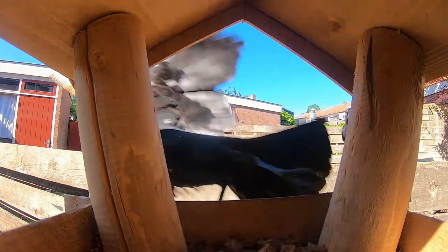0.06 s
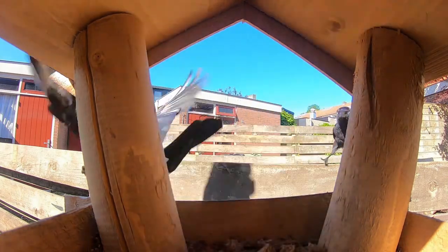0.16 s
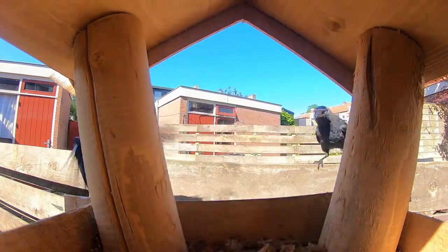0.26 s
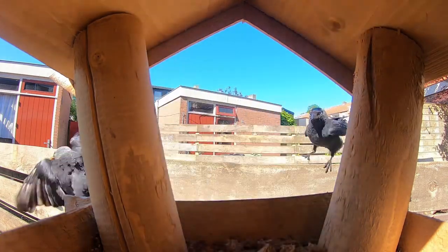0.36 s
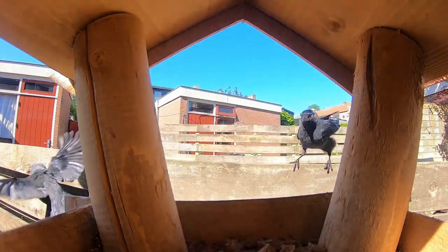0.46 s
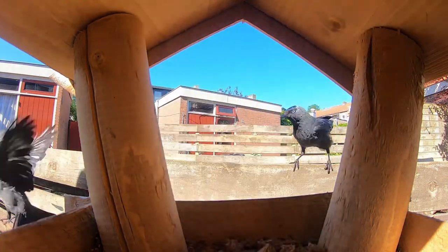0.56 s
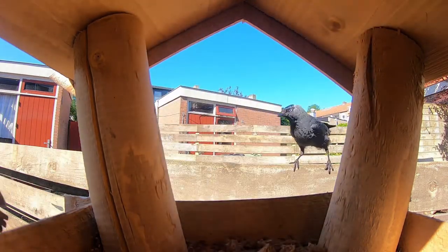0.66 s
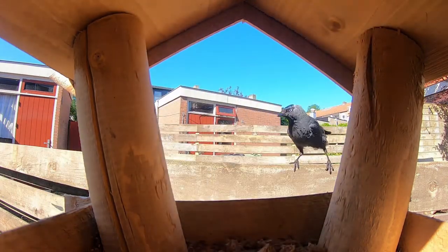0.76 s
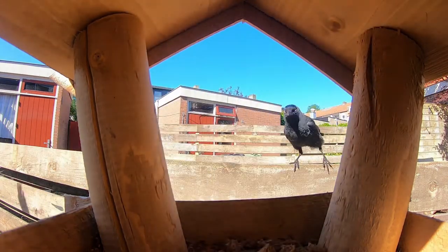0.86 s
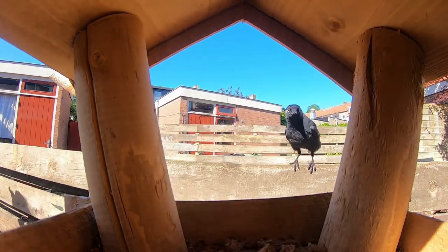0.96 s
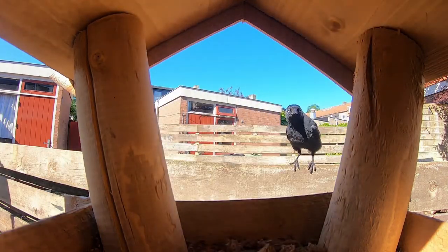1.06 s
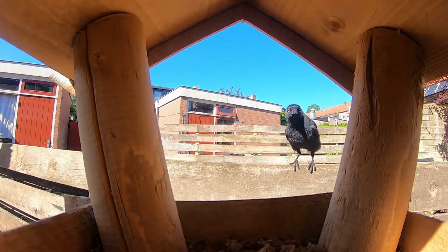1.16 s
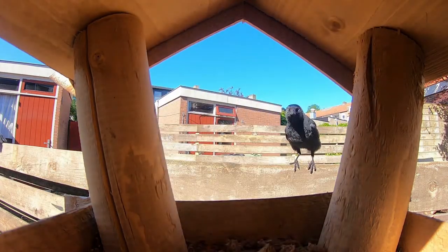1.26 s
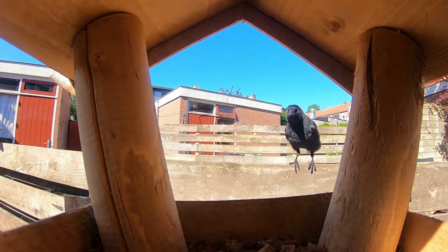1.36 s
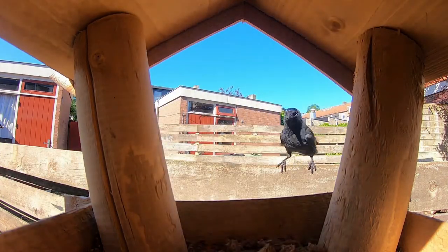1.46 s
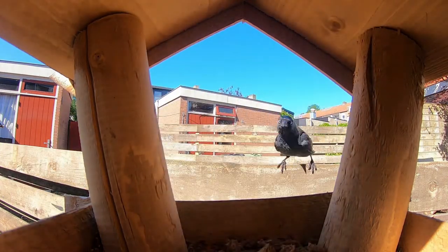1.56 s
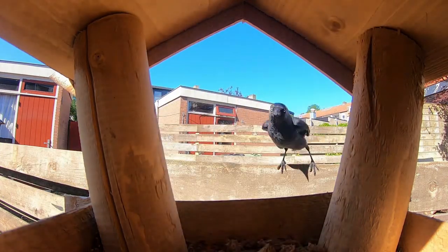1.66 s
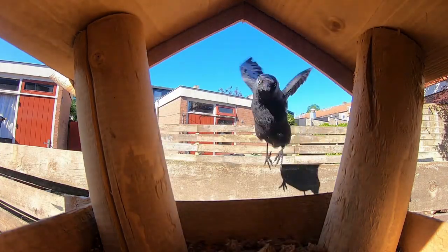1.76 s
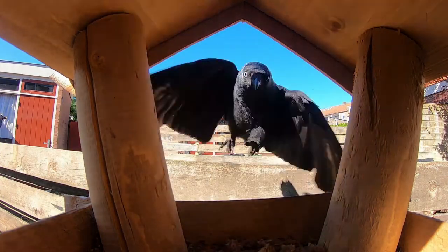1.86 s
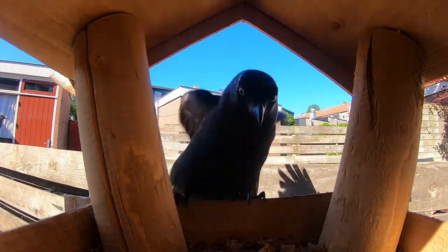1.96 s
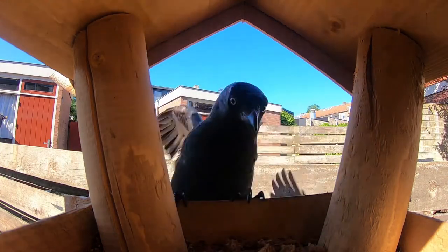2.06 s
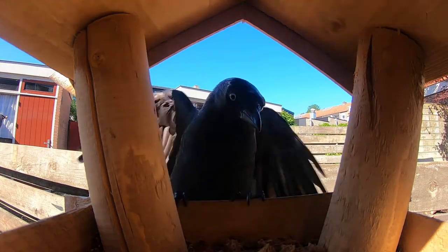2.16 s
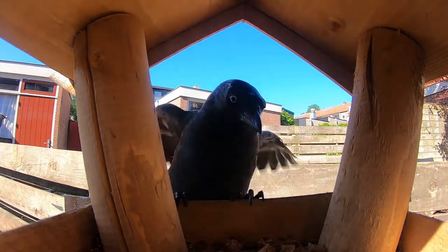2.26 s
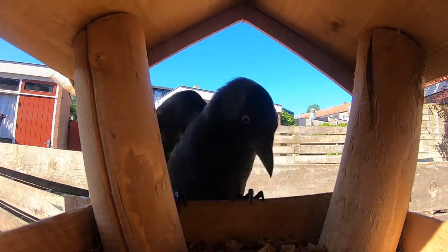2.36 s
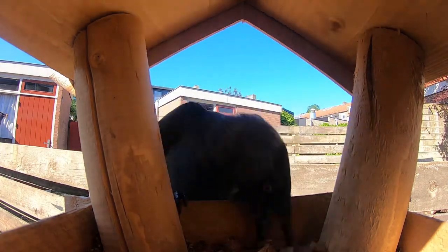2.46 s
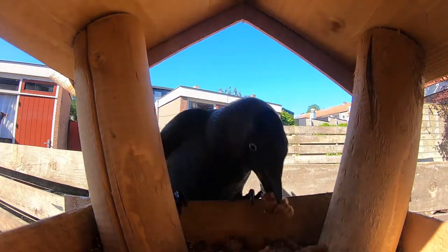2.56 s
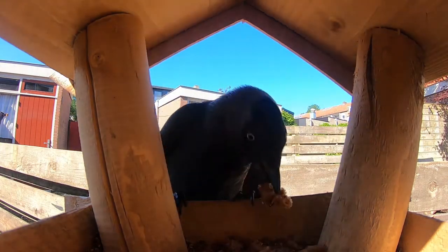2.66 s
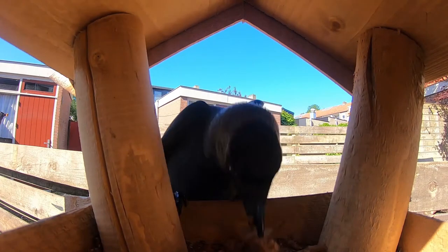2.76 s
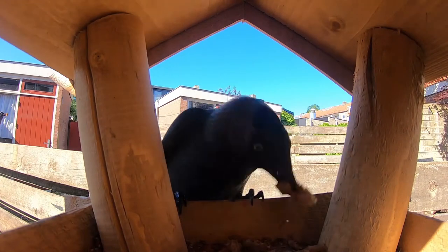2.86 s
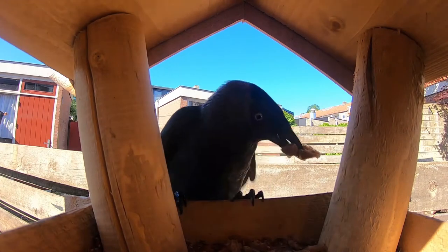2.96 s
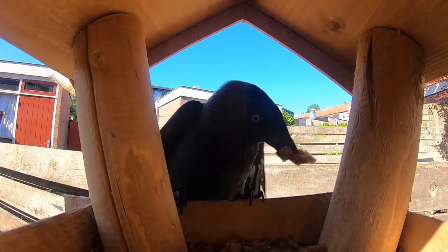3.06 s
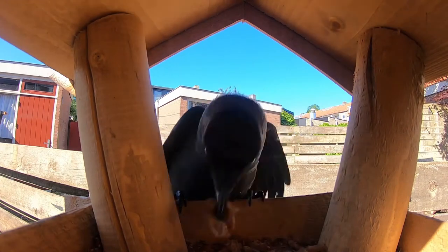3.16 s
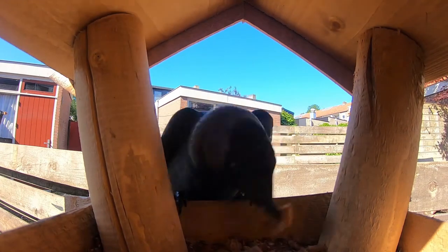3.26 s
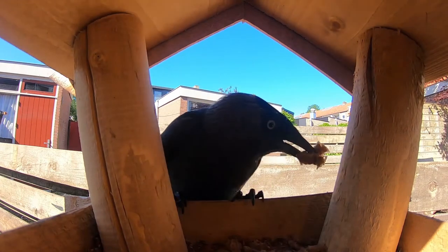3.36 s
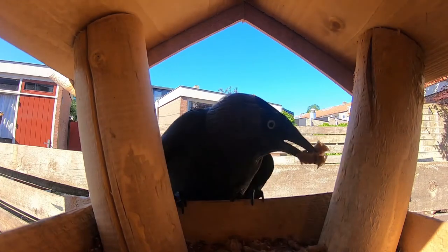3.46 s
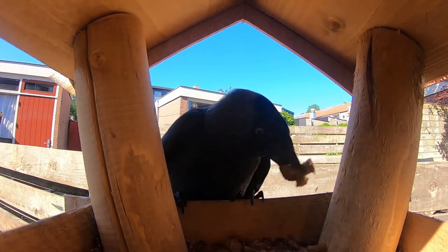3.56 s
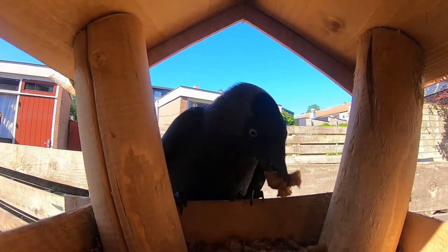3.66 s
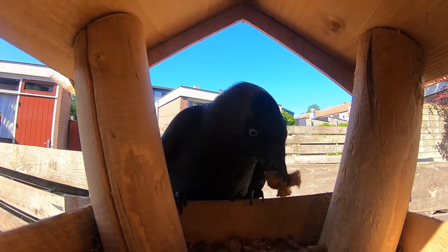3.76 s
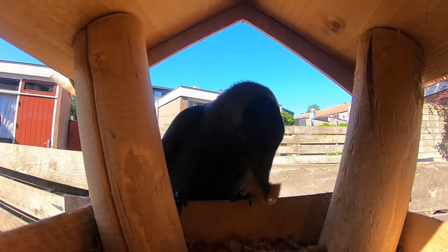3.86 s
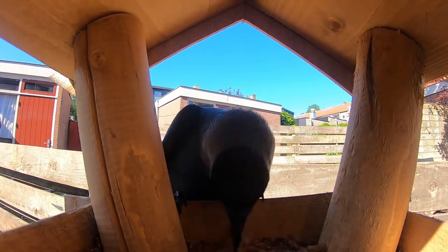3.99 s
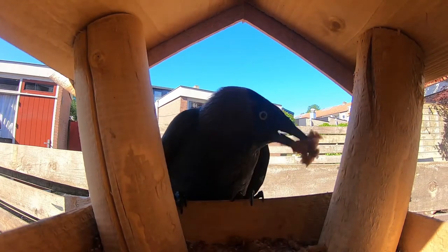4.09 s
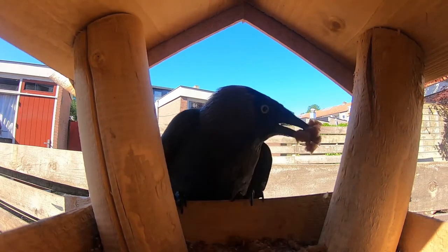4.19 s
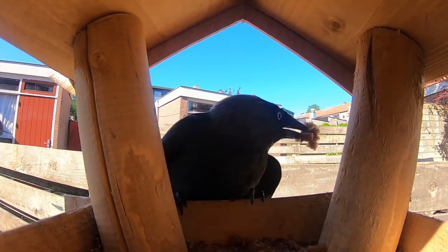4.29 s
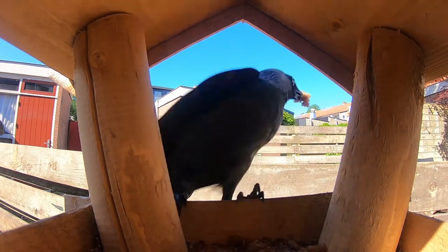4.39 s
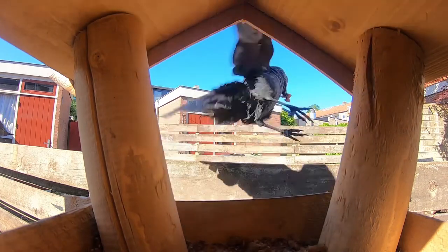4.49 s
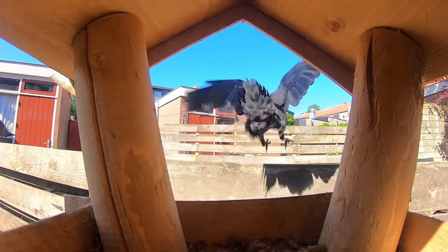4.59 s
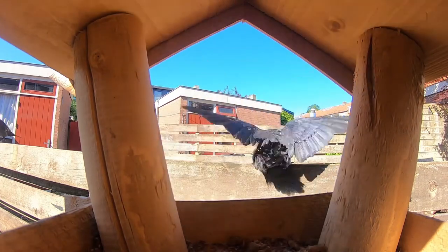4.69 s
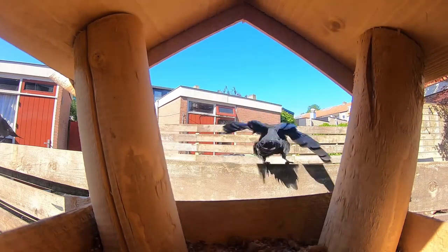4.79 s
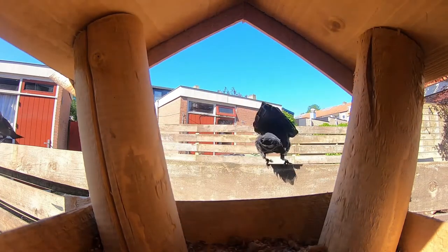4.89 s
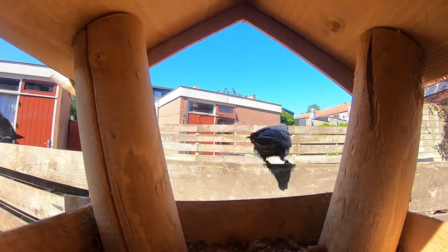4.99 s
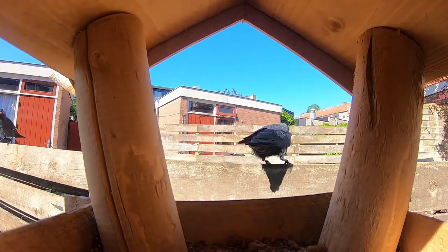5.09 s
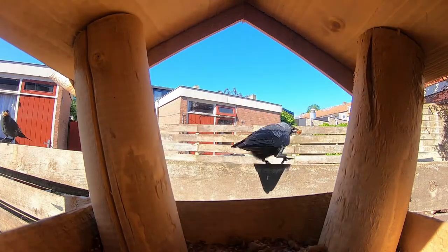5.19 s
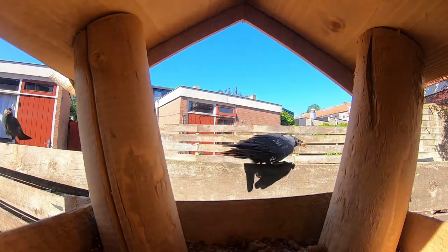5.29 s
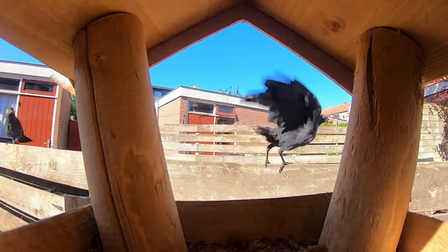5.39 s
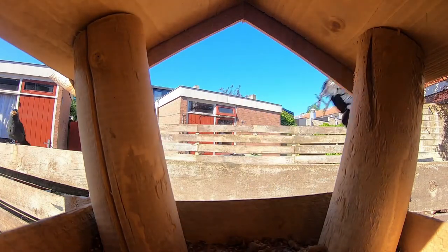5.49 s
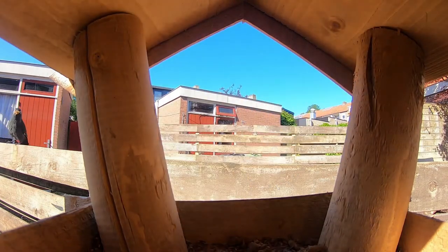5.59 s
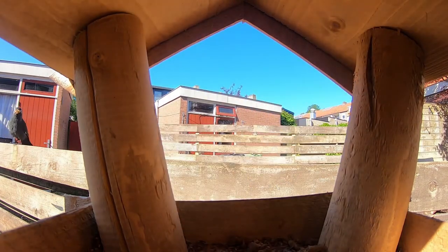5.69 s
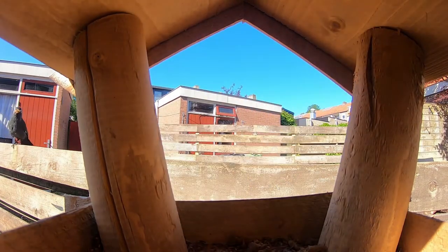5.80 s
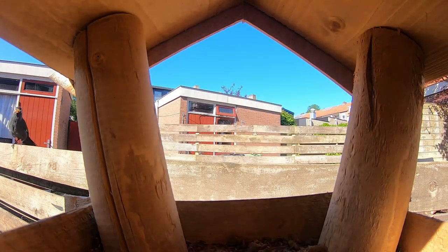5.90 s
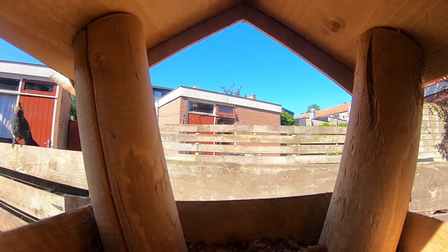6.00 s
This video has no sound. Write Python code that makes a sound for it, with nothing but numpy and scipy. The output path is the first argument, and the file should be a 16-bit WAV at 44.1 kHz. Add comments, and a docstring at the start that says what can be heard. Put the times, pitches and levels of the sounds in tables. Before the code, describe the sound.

A crow-sized bird scrabbles and flaps off hollow wood; a second lands with a sharp knock, pecks, hops to a fence and flutters away.

```python
"""Crow-sized birds at a roofed wooden feeder, heard by a camera inside it: claws, beak and wings strike the wood.
One bird scrambles off and beats away; another hops from the fence, lands on the perch, pecks the tray,
leaves, drops onto the fence and flies off. Scrapes of noise ring wood resonances, wing strokes are shaped noise,
and each jolt rocks the feeder on its pole as decaying sines. The fence is farther off and wetter;
a quiet garden of noise, a hum and faint tones lies behind."""
import sys
import numpy as np
from scipy import signal
from scipy.fft import rfft, irfft, next_fast_len
from scipy.io import wavfile
from scipy.ndimage import uniform_filter1d, map_coordinates

SR = 44100
rng = np.random.default_rng(int(sys.argv[2]) if len(sys.argv) > 2 else 0)


def master(y):
    """Save y as 16-bit WAV."""
    cut = np.clip(np.atleast_2d(y).T, -1, 1)
    pcm = np.round(cut * 32767)  # scale
    wavfile.write(sys.argv[1], SR, pcm.astype(np.int16))


N = 266408

# Claws on the perch, close by:
# [t/s, wood ring peak level/dB, box thud/dB re ring, treble/dB re ring, favoured f/Hz, scrape fall/s]
CLAWS = [(.0074, -20.5, -9, -43, 2160, 0.0043), (.0274, -23.5, -6, -17, 2130, .0033),
         (.0412, -21, -3, -17, 2660, 0.0047), (.0589, -22, -3.5, -10, 2840, 0.011),
         (.0742, -16, -15, -11.5, 2780, 0.0068), (.0798, -12.5, -15, -22, 2700, 0.0027),
         (.0984, -25, -1, -4, 2580, 0.0069), (.1107, -17.5, -4.5, -14, 2530, 0.0084),
         (.121, -20, -18, 0, 3510, .0012), (.1265, -16, -1, -2, 3460, 0.0044),
         (.1297, -20, -10, -21.5, 3500, 0.0018), (.2017, -45, 9.5, -23, 1270, 0.0028),
         (1.9939, -16, 0.5, -10.5, 1370, 0.0026), (2.0018, -12, -1.5, -8.5, 2320, 0.0047),
         (2.0057, -17.5, -22, -35, 2680, 0.0024), (2.0174, -43.5, 23, -27, 1870, 0.003),
         (2.0385, -46, 9, -21, 2190, 0.0027), (2.0762, -44.5, 7.5, -2, 2690, 0.0054),
         (2.056, -41, 2, -15, 2690, 0.0026), (2.1488, -46.5, 5.5, -12, 1430, 0.0026),
         (2.2097, -48.5, 6.5, 1, 2520, 0.012), (2.3853, -51, 4.5, 3.5, 2590, 0.0013),
         (2.4544, -46, -3, 4, 1500, 0.0011), (4.42, -52.5, 15, -16, 2800, 0.006),
         (4.4445, -31, 7, -22, 1380, 0.0056), (4.4715, -34, 1.5, -30, 2740, 0.0038),
         (4.4869, -35, -3.5, -29, 3670, 0.0062), (4.511, -40, -2, -10, 2160, 0.0017),
         (4.569, -42, -11, -5, 2080, 0.0022)]
# Resonances of the perch [f/Hz, width/Hz, level/dB]
PERCH = [(1373, 140, -10.5), (1970, 82, -4.5), (2100, 41, -2), (2730, 120, -5.5), (3474, 66, -6),
         (3800, 210, -9)]


def claws():
    """Claws scramble and land on the perch, whose narrow modes depend strongly on the spot touched."""
    return contacts(CLAWS, PERCH, spot_db=17.5, box_hz=634, echo_db=-22, pan_db=-0.6, rise=0.0016)


# Pecks on the tray, close by:
# [t/s, wood ring peak level/dB, box thud/dB re ring, treble/dB re ring, favoured f/Hz, scrape fall/s]
PECKS = [(2.5359, -24.5, -13, -1.5, 3430, 0.0073), (2.5644, -44, -4, 0, 1490, .004),
         (2.603, -47, -14, 1, 4310, .004), (2.8529, -32.5, 1.5, -2, 1500, 0.0036),
         (2.8619, -36, -0.2, -7, 1570, 0.011), (2.8955, -46, -5, -8, 3420, 0.009),
         (2.9344, -50, -6, -14, 2220, .008), (2.9725, -53, -17, 9, 2090, 0.00081),
         (3.2646, -16, 1, -21, 1470, 0.0026), (3.2794, -37.5, 14.5, 3, 1270, 0.0039),
         (3.2974, -29.5, -1.5, -8, 1520, 0.00098), (3.319, -45.5, -13, -6.5, 1520, .002),
         (3.3386, -46.5, -9.5, -6, 1520, .003), (3.4351, -51, -31.5, -4.5, 4090, .0036),
         (4.0206, -38, -23, -10, 1580, 0.0073), (4.0387, -42, -17, -8, 1600, 0.01),
         (4.148, -48, -20, -25, 1530, 0.0091), (4.1644, -49.5, -9, -26, 1310, 0.0038)]
# Resonances of the tray [f/Hz, width/Hz, level/dB]
TRAY = [(870, 300, -11), (1376, 72, 0.5), (1610, 99, -0.5), (2150, 205, -8), (2544, 146, -6.5),
        (3500, 700, -10), (4410, 340, -4)]


def pecks():
    """Pecks ring the tray, a little to the right of centre."""
    return contacts(PECKS, TRAY, spot_db=5.5, box_hz=460, echo_db=-20, pan_db=-2.5, rise=0.0018)


# Wings slapping the post:
# [t/s, wood ring peak level/dB, box thud/dB re ring, treble/dB re ring, favoured f/Hz, scrape fall/s]
WING_SLAPS = [(.2738, -18, -9.5, -7, 1030, 0.0046), (.2909, -38, 4, -4, 1160, 0.0098),
              (.3344, -29, -2, -13, 1180, 0.0016), (.3699, -28, -13, -1.5, 1190, 0.0045),
              (.3857, -21.5, -7.5, -7.5, 3970, 0.011), (.5434, -24, -7, -3, 2160, 0.0043)]
# Resonances of the post [f/Hz, width/Hz, level/dB]
POST = [(1036, 330, 0.5), (1415, 590, 0.5), (2290, 265, -1.5), (2600, 140, -1), (4260, 840, -1)]


def wing_slaps():
    """Wings slap the post, with much more echo than the claws."""
    return contacts(WING_SLAPS, POST, spot_db=5.5, box_hz=654, echo_db=-7.5, pan_db=0.0, rise=0.0022)


# Resonances of the feeder box, heard as the thud [f/Hz, width/Hz, level/dB]
BOX = [(281, 59, 1.5), (393, 49, -2), (511.4, 98, 0), (628, 66.7, -4), (961, 180, -12.5)]
# Treble resonances of each contact [f/Hz, width/Hz, level/dB]
CRACK = [(5885, 1200, -2.5), (7500, 410, -3), (9130, 880, -7.5)]
# Side signal of the contacts relative to mid [f/Hz, level/dB]
SIDE_RE_MID = [(300, -17), (600, -13), (1200, 4.5), (2500, -6), (5000, -5.5), (10000, 5)]


def contacts(table, wood, spot_db, box_hz, echo_db, pan_db, rise):
    """Each contact is a short scrape of noise that rings the wood, thuds the box and cracks in the treble."""
    knock = 5.5  # the first hard touch, over the scrape that follows
    brush_db = -21.5  # the brush before a blow; it fades as the thud grows
    early = SR // 40  # samples kept before the touch
    out = np.zeros((2, N + 2 * SR))  # one spare second at each end
    for s, db, thud_db, treble_db, spot_hz, fall in table:
        u = (np.arange(SR // 8) - early) / SR - 0.5 * rise
        # a light brush leads into a scrape; a heavy blow comes sudden
        brush = min(amp(brush_db - thud_db), 0.4) * np.exp(-np.abs(u) / (2.4 * rise))
        lead_in = 0.31 * np.exp(-(u / rise) ** 2) + brush
        press = np.where(u < 0, lead_in, np.exp(-np.abs(u) / fall))

        # separate noise for the wood, the box and the crack
        mid, side = press * rng.standard_normal((2, 3, len(u)))
        mid[:, early] += knock
        side = filtered(side, lambda f: amp(along(SIDE_RE_MID, f)))
        force = np.array([mid + side, mid - side])

        bodies = (resonances(wood, spot_hz, spot_db),
                  resonances(BOX, box_hz, spot_db=12.0),
                  resonances(CRACK, 7000, spot_db=0))
        click = 0
        for k, (body, level_db) in enumerate(zip(bodies, (0, thud_db, treble_db))):
            part = filtered(force[:, k], body)
            click = click + amp(level_db) * part / np.abs(part.mean(0)).max()
        click = amp(db) * sides(pan_db) * click
        click = np.pad(click, ((0, 0), (0, SR // 4)))  # room for the echo
        start = round(s * SR) + SR - early
        out[:, start:start + click.shape[1]] += click + amp(echo_db) * yard(click)
    return out[:, SR:N + SR]


# Wing strokes [t/s of the middle, rustle level/dB, swish level/dB, air thump level/dB]
STROKES = [(.205, -55.5, -49, -42), (0.358, -65, -44, -26.5), (0.464, -52.5, -48.5, -46),
           (0.642, -51.5, -51, -52), (0.7804, -47.5, -49, -50), (.907, -49, -49, -43),
           (1.065, -53.5, -52.5, -53), (1.205, -67, -68.5, -72), (1.775, -59, -73, -82),
           (1.866, -52, -85, -73), (1.941, -48, -52, -50.5), (2.1478, -51.5, -51.5, -50),
           (4.49, -42.5, -55, -47), (4.562, -52.5, -81, -47), (4.614, -58, -87, -61),
           (4.715, -59, -58.5, -65), (5.5028, -48.5, -46.5, -50), (5.617, -47, -38, -45),
           (5.751, -50.5, -44.5, -40), (5.88, -52, -49, -52), (6.021, -54.5, -51.5, -55)]
# Spectra of feather rustle, air swish and air thump at the microphones [f/Hz, level/dB]
RUSTLE = [(300, -6), (600, -6), (1000, -9), (1600, -8), (2500, -9), (3500, -13), (5400, -14.5),
          (7500, -15.5), (9500, -17.5), (15500, -27)]
SWISH = [(53, -45), (90, -9), (223, 2.5), (329, -8.5), (457, -6), (558, -5), (674, -10), (1500, -27.5),
         (1950, -68), (3300, -120)]
THUMP = [(15, -24), (30, 12.5), (45, 7.5), (75, -12), (130, -30), (250, -96.5)]
# Left-right likeness of the rustle [f/Hz, likeness from 0 to 1]
RUSTLE_ALIKE = [(300, 1), (600, 0.36), (1600, 0.15), (5000, 0.48), (12000, 0.056)]


def wings():
    """Every downstroke swells and fades: feathers rustle, air swishes in lumps and thumps the microphones."""
    t = np.arange(N) / SR
    rustle, swish, thump = np.zeros((3, 2, N))
    gaps = np.diff([-N] + [row[0] for row in STROKES] + [N])
    half_lengths = 0.35 * np.minimum(gaps[1:], gaps[:-1])  # share of the time to the nearest neighbour
    pan = sides(-1.2)
    for (s, rustle_db, swish_db, thump_db), half in zip(STROKES, half_lengths):
        swell = np.exp(-np.abs((t - s) / half) ** 2.4)
        gust = np.roll(swell ** 2, round(0.011 * SR))  # shorter, and it arrives after the sound
        rustle += amp(rustle_db) * swell * pan
        swish += amp(swish_db) * swell * pan
        thump += amp(thump_db) * gust * pan
    crackle = unit(amp(3.5 * wobble(300)))
    lumps = unit(amp(2.2 * wobble(70)))
    feathers = rustle * crackle * rush(RUSTLE, RUSTLE_ALIKE, patchy_db=4)
    air = swish * lumps * steady(rush(SWISH, [(300, 1.0)], patchy_db=2.0))
    return feathers + air + thump * steady(rush(THUMP, [(50, 1.0)], patchy_db=2.5))


# Modes of the feeder rocking on its pole [f/Hz, t60/s, swell/s, L-R level/dB, left lead/rad]
ROCKING = [(47.94, 0.43, 0.048, -5, 1.5), (93.3, 0.32, 0.036, -13, 4.5), (136, 0.4, 0.02, -14, 2.1),
           (173, .2, 0.0018, 14.5, 0.44)]
# Jolts [t/s, level/dB, place from 0 on the perch to 1 on the tray]
JOLTS = [(.010, -30.5, 0.24), (0.134, -24, .05), (0.198, -39, 1), (2.008, -20.5, .05), (2.180, -38, .2),
         (2.544, -33.5, 0.98), (2.86, -26, 0.94), (2.961, -38, 1), (3.267, -16.5, 0.63),
         (3.381, -35.5, 0.41), (4.026, -36, 1), (4.45, -41.5, 0.33), (4.510, -45, 0.86)]
# How a jolt reaches each mode, low to high, from the perch and from the tray [level/dB]
FROM_PERCH = [-16.5, -16.5, -1.2, -10]
FROM_TRAY = [2.2, 3.6, -11, -13]


def rocking():
    """Each jolt builds up the pole's modes; the mount takes them to each microphone at its own phase."""
    t = np.arange(SR) / SR
    out = np.zeros((len(ROCKING), 2, N + SR))
    hz, t60, swell, lean_db, lead = np.transpose(ROCKING)[..., None, None]
    half = np.array([[0.5], [-0.5]])  # left, right
    for s, jolt_db, place in JOLTS:
        db = jolt_db + (1 - place) * np.array(FROM_PERCH) + place * np.array(FROM_TRAY)
        decay = amp(np.reshape(db, hz.shape) - 60 * t / t60 + half * lean_db)
        strength = decay * (1 - np.exp(-t / swell))
        start = round(s * SR)
        out[..., start:start + SR] += strength * np.sin(2 * np.pi * hz * t + half * lead)
    # the moving bird loads the pole unevenly
    load = np.array([[amp(2 * wobble(33))] for mode in ROCKING])
    return (out[..., :N] * load).sum(0)


# A narrow ring follows the wing slaps [t/s, f/Hz, level/dB, t60/s, L-R level/dB]
SQUEAK = (.397, 1645, -24, .09, 6)
# Its pitch and overtones [multiple of the pitch, level/dB]
SQUEAK_TONES = [(1.0, 0.0), (2.86, -17), (3.9, -18)]


def squeak():
    """After the wing slaps, a narrow ring with a soft start and two faint overtones."""
    s, hz, db, t60, pan_db = SQUEAK
    t = np.maximum(np.arange(N) / SR - s, 0)
    tones = 0
    for multiple, level_db in SQUEAK_TONES:
        tones = tones + amp(level_db + 2 * wobble(106)) * np.sin(2 * np.pi * multiple * hz * t)
    soft_start = 1 - np.exp(-t / 0.00059)
    return amp(db - 60 * t / t60) * soft_start * tones * sides(pan_db)


# Feathers and feet shuffling [t/s, level/dB]
SHUFFLE = [(0.0, -45.5), (.55, -53), (1.1, -56), (1.58, -71), (1.95, -59), (2.42, -56), (2.71, -58.5),
           (2.82, -63.5), (2.94, -58), (3.28, -59.5), (3.68, -78), (3.95, -76), (4.16, -65), (4.29, -76),
           (4.44, -53.5), (4.78, -64.5), (4.93, -73.5), (5.37, -72.5), (5.47, -52.5), (6.04, -57.5)]
# The pole swaying under a bird's weight [t/s, level/dB]
SWAYING = [(0.0, -45), (.27, -34.5), (.55, -72), (1.38, -86), (1.9, -74), (2.17, -46.5), (2.55, -52),
           (2.78, -67), (3.5, -48.5), (4.1, -49.5), (4.29, -61), (4.5, -62.5), (5.3, -67), (5.7, -57),
           (6.04, -66)]
# Spectrum of the sway [f/Hz, level/dB]
SWAY = [(15, -20), (35, 5), (47, -1.5), (65, -2.5), (90, -9), (110, -16.5), (135, -7), (200, -72)]


def bustle():
    """Between the blows the birds shuffle, and their weight keeps the pole swaying."""
    shuffle_db, = curves(SHUFFLE)
    sway_db, = curves(SWAYING)
    grains = unit(amp(2 * wobble(350)))
    shuffle_level = amp(shuffle_db + 0.85 * wobble(28))
    shuffle = shuffle_level * grains * rush(RUSTLE, RUSTLE_ALIKE, patchy_db=2.0)
    sway = amp(sway_db) * rush(SWAY, [(47, 0.45), (90, 0.054)], patchy_db=5.0) * sides(2.5)
    return shuffle + sway


# Hops on the fence, farther off:
# [t/s, wood ring peak level/dB, box thud/dB re ring, treble/dB re ring, favoured f/Hz, scrape fall/s]
FENCE_HOPS = [(1.3266, -41.5, -19, -32, 1290, 0.0055), (1.3444, -40.5, -24, -34, 1140, 0.0038),
              (1.3594, -43.5, -14, -28, 1220, .003), (1.4414, -66, -19, 13.5, 3400, .003),
              (1.501, -62.5, -9, 4, 3460, .003), (1.5354, -53, -4, -12, 1040, .004),
              (1.7267, -45, -10, -0.5, 4060, .002), (1.7358, -40, -28, -30, 4060, 0.0061),
              (1.7655, -43.5, -19, -26, 1080, .003), (4.7201, -31, -3.5, -13, 1110, 0.0079),
              (4.7262, -29, -17, -7, 1180, 0.0066), (4.7531, -35.5, -22, -36, 1070, 0.003),
              (4.9388, -50, -19, -16, 1223, 0.011), (4.9667, -53.5, -8.5, -27.5, 1306, 0.013),
              (5.1947, -50, -25, -34, 1514, .004), (5.3585, -44.5, -25.5, -38, 1310, 0.0025),
              (5.4914, -30, -13.5, -12, 1370, 0.0061), (5.5179, -43, -21, -22, 1030, .003),
              (5.5447, -41.5, -25, -4.5, 1480, 0.0022)]
# Resonances of the fence [f/Hz, width/Hz, level/dB]
FENCE = [(890, 820, 5.5), (1450, 573, 6.5), (1980, 756, 4), (3500, 3400, -3)]


def fence_hops():
    """Feet strike the fence, whose broad modes come with a strong yard echo."""
    return contacts(FENCE_HOPS, FENCE, spot_db=6.0, box_hz=647, echo_db=-7, pan_db=-0.5, rise=0.0026)


# Decay of the yard [f/Hz, t60/s]
YARD = [(200, .25), (1500, 0.32), (5000, 0.43), (12000, 0.27)]


def yard(x):
    """Roof, fence and walls answer; each frequency dies at its own speed."""
    hz, t, z = signal.stft(rng.standard_normal((2, SR // 4)), SR, nperseg=256)
    decay = amp(-60 * t / along(YARD, hz)[:, None])
    tail = signal.istft(z * decay, SR, nperseg=256)[1]
    return signal.fftconvolve(x, tail / np.linalg.norm(tail[0]), axes=1)[:, :x.shape[1]]


# Spectrum of the garden [f/Hz, level/dB per Hz]
GARDEN = [(60, -38.5), (115, -19), (180, -11), (300, -20), (600, -23.5), (1200, -25.5), (2500, -36.5),
          (5000, -42.5), (10000, -57), (15500, -55.5)]
# Faint far tones [t/s of the middle, half length/s, f/Hz, level/dB]
FAR_TONES = [(1.38, .05, 290, -64), (1.64, .075, 2620, -75), (2.78, .07, 340, -63)]


def garden():
    """Far traffic and leaves are noise; a wavering hum and a few faint tones are sines."""
    t = np.arange(N) / SR
    alike = [(150, 0.36), (1000, 0.5), (5000, 0.3)]  # f/Hz, left-right likeness
    far = amp(-64.5 + 0.7 * wobble(1.5)) * rush(GARDEN, alike, patchy_db=-2.2)
    hum = amp(-70 + 4.4 * wobble(24)) * np.sin(2 * np.pi * 173 * t + 0.53 * wobble(6.2))
    tones = 0
    for s, half, hz, db in FAR_TONES:
        level = amp(db + 2.5 * wobble(30.55)) * np.exp(-((t - s) / half) ** 4)
        tones = tones + level * np.sin(2 * np.pi * hz * t + 2 * wobble(49))
    return far + hum + tones


def amp(db):
    """Gain of a level in dB."""
    return 10 ** (np.asarray(db) / 20)


def unit(x):
    """x at rms 1."""
    return x / np.sqrt(np.mean(x ** 2) + 1e-20)


def steady(x):
    """x with its own slow swells evened out."""
    power = uniform_filter1d(np.mean(x ** 2, axis=0), size=SR // 16)
    return x / np.sqrt(np.abs(power) + 1e-3)


def along(points, hz):
    """Values at hz from (f/Hz, value) points on a log axis."""
    f, v = np.transpose(points)
    return np.interp(np.log(hz + 1), np.log(f + 1), v)


def curves(rows):
    """One value per sample for each column after the time."""
    s, *cols = np.transpose(rows)
    return [np.interp(np.arange(N) / SR, s, c) for c in cols]


def wobble(rate):
    """A smooth random curve, rate knots a second."""
    return map_coordinates(rng.standard_normal(int(N * rate / SR) + 4), [np.arange(N) * rate / SR])


def sides(pan_db):
    """Left and right gain, pan_db apart."""
    return amp(np.array([[0.5], [-0.5]]) * pan_db)


def filtered(x, response):
    """x through a complex response of frequency."""
    n = x.shape[-1]
    m = next_fast_len(n + 4096)
    return irfft(rfft(x, m) * response(np.fft.rfftfreq(m, 1 / SR)), m)[..., :n]


def resonances(modes, favoured_hz, spot_db):
    """Causal response of modes, weaker by spot_db for each octave from the favoured frequency."""
    def response(f):
        ring = 0
        for k, (centre, width, db) in enumerate(modes):
            gain = amp(db - spot_db * abs(np.log2(centre / favoured_hz)))
            damping = 1j * f * width
            ring = ring + (-1) ** k * gain * centre * damping / (centre ** 2 - f ** 2 + damping) / centre
        no_deep_bass = (1j * f / (0.37 * modes[0][0] + 1j * f)) ** 2
        return ring * no_deep_bass / (1 + 1j * f / (0.95 * modes[-1][0]))  # duller above the top mode
    return response


def rush(spectrum, alike, patchy_db):
    """Stereo noise of rms 1 with a spectrum, a left-right likeness and patches of random gain."""
    z = signal.stft(rng.standard_normal((2, N)), nperseg=512)[2]
    field = uniform_filter1d(rng.standard_normal(z.shape[1:]), size=6, axis=0)  # over frequency
    field = uniform_filter1d(field, size=8, axis=1)  # over time
    pair = signal.istft(z * amp(patchy_db * unit(field)), nperseg=512)[1][:, :N]

    def mid_side_gain(hz):
        turn = np.arccos(np.clip(along(alike, hz), -1, 1)) / 2
        return amp(along(spectrum, hz)) * [np.cos(turn), np.sin(turn)]

    mid, side = filtered(pair, mid_side_gain)
    return unit(np.array([mid + side, mid - side]))


def scene():
    """Near blows on perch and tray are nearly dry; the fence is farther and wetter."""
    feeder = claws() + pecks() + wing_slaps() + rocking() + squeak()
    return feeder + wings() + bustle() + fence_hops() + garden()


# Response of the camera's microphones [f/Hz, level/dB]
MIC = [(9000, -0.5), (10500, -4.5), (11500, -13), (14000, -10), (15800, -34.5)]


def record(dry):
    """The microphone loses the top octave, and the camera keeps nothing above its band limit."""
    top_hz = 15800
    return filtered(dry, lambda hz: amp(along(MIC, hz)) * (hz < top_hz))


dry = scene()
out = record(dry)
master(out)
```